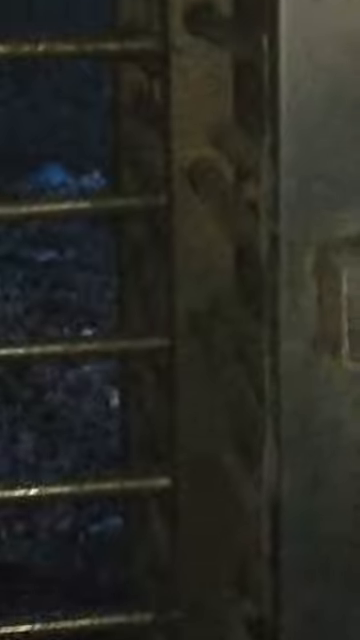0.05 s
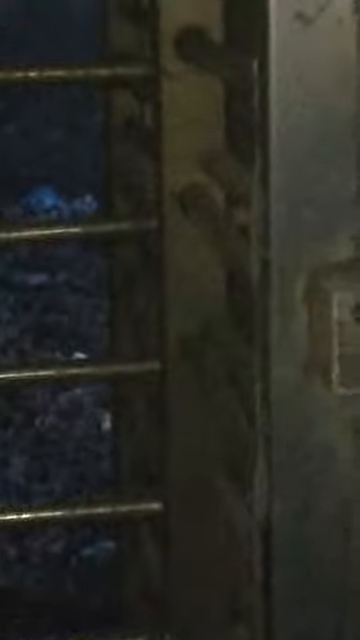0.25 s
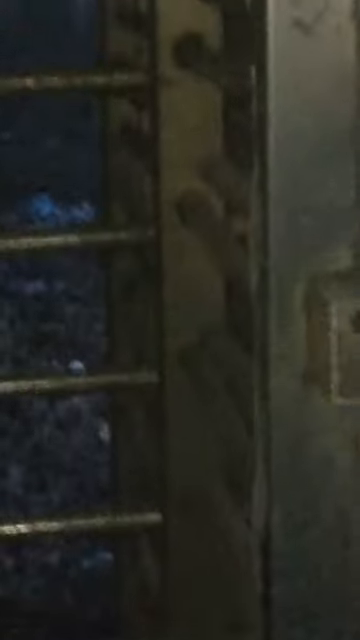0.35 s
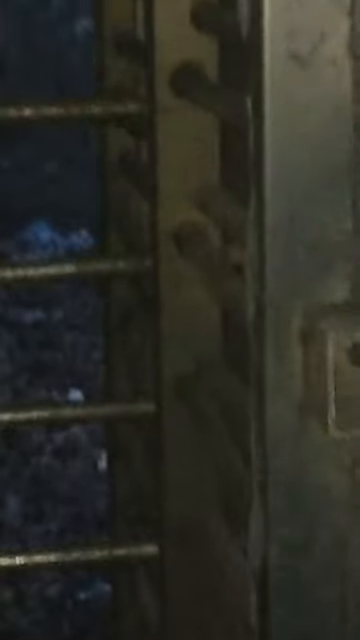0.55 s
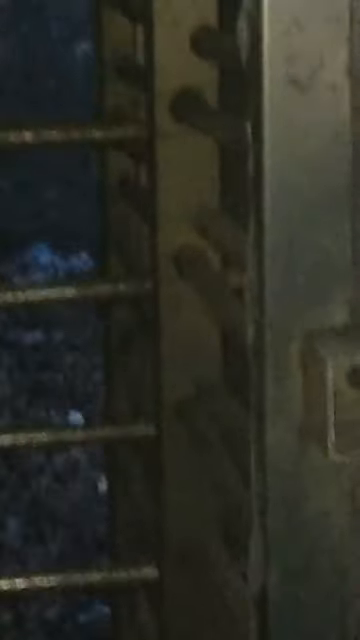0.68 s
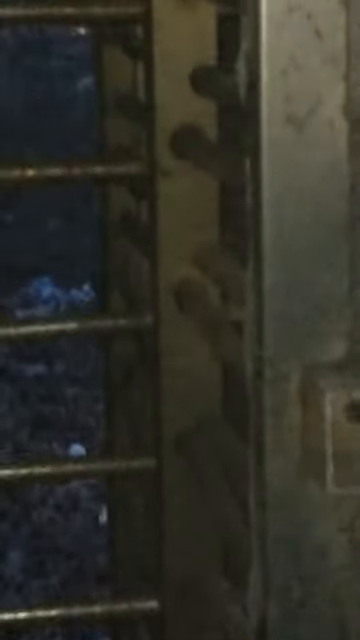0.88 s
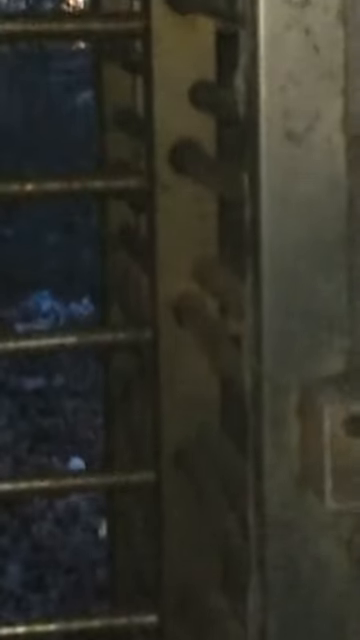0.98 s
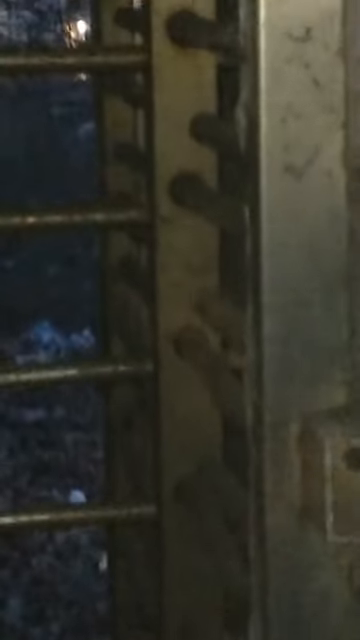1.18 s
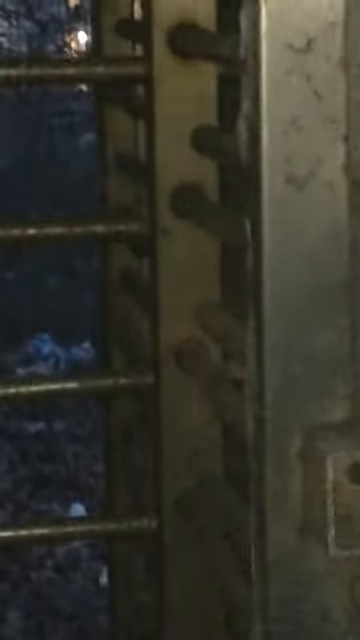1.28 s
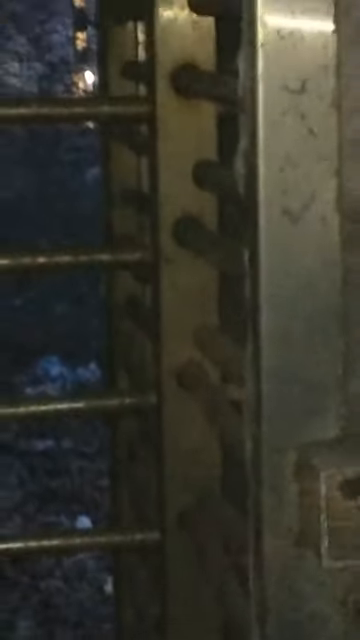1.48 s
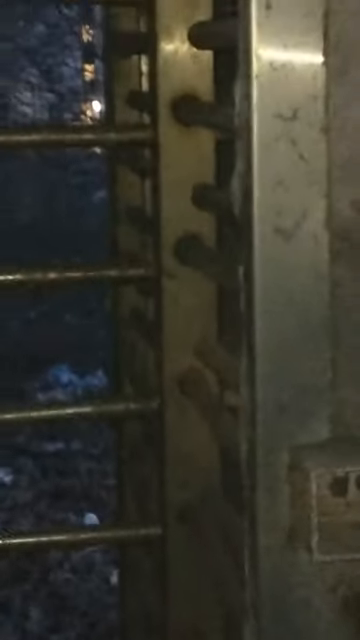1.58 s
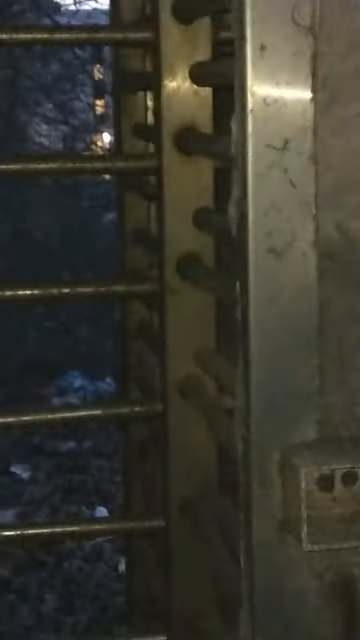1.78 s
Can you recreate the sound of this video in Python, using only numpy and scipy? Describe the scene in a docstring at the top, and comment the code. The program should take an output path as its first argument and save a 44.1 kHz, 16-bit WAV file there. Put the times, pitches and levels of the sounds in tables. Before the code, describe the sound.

A steel turnstile latch slams with one sharp, briefly ringing clunk after a soft scuff; loose parts rattle, a pawl clicks, and light ticks follow. Close handheld microphone with low bumps, quiet outdoor rumble behind.

```python
"""A distant outdoor rumble (coloured noise) runs throughout, under a far hiss that fades.
A soft scuff comes first; then low bumps on the hand-held microphone (short sine swells) and the first rattles.
A steel turnstile clunks once: the latch slams home in a quick run of noise bursts, and decaying sines ring.
Loose parts rattle on as bursts of noise; later the pawl drops into its notch, followed by two faint rattles.
Last come a few light ticks of a small part, each a click with a short ping, and a few more bumps."""
import sys
import numpy as np
from scipy import signal
from scipy.fft import rfft, irfft
from scipy.io import wavfile

SR = 44100
rng = np.random.default_rng(int(sys.argv[2]) if len(sys.argv) > 2 else 0)


def wav_out(sig):
    """Save sig, one row per channel (or a flat mono array), as 16-bit PCM at SR to the path in sys.argv[1]."""
    wavfile.write(sys.argv[1], SR, np.round(np.clip(np.atleast_2d(sig).T, -1, 1) * 32767).astype(np.int16))


N = 81585
TIME = np.arange(N) / SR  # seconds
CUTOFF_HZ = 7900  # top of the sound
CONTACT_RISE_S = 0.00089  # rise of every small contact


def from_db(db):
    """Turn decibels into a plain gain."""
    return 10 ** (np.asarray(db) / 20)


def noise(spectrum):
    """Noise whose strength at each pitch follows a table, scaled to an rms of 1."""
    hz, db = np.transpose(spectrum)
    freqs = np.maximum(np.arange(N // 2 + 1) * SR / N, 1)
    gain = from_db(np.interp(np.log(freqs), np.log(hz), db))
    gain = gain * (freqs < CUTOFF_HZ + 1000)
    coloured = irfft(rfft(rng.standard_normal(N)) * gain, N)
    return coloured / coloured.std()


def lowpass(sound, hz, order=1):
    """Soften a sound by weakening what lies above hz (Butterworth filter)."""
    safe_hz = np.clip(hz, 10, SR / 2 - 1000)
    sos = signal.butter(order, safe_hz, fs=SR, output="sos")
    return signal.sosfilt(sos, sound + 1e-18)  # the tiny offset is inaudible


def burst(start_s, t60_s, rise_s):
    """Loudness of a blow: a quick rise times a decay that falls 60 dB in t60_s."""
    age = np.maximum(TIME - start_s, 0)
    decay = np.exp(-np.minimum(np.log(1000) * age / t60_s, 20))
    return (1 - np.exp(-age / rise_s)) * decay


def ring(start_s, hz, t60_s, rise_s):
    """One way a struck part vibrates: a sine that dies away."""
    return np.sin(2 * np.pi * hz * (TIME - start_s)) * burst(start_s, t60_s, rise_s)


def contact(start_s, t60_s):
    """Loudness of a small contact, with a faint, longer answer from the surroundings."""
    direct = burst(start_s, t60_s, CONTACT_RISE_S)
    echo = from_db(-30) * burst(start_s, 0.21, .004)
    return np.hypot(direct, echo)


def clicks(touches, spectrum, t60_s):
    """Short, heavily damped touches that share one colour of noise."""
    loudness = sum(from_db(db) * contact(s, t60_s) for s, db in touches)
    return noise(spectrum) * loudness


def outdoors():
    """Far sounds blur into noise: a steady rumble and a hiss that fades."""
    # colour of the rumble: (frequency [Hz], relative level per Hz [dB])
    rumble_colour = [(25, -23.5), (45, -8), (65, 3), (100, -0.5), (160, -7.5), (210, -12), (320, -10),
                     (500, -13), (800, -15.5), (950, -6), (1140, -5.5), (1300, -16.5), (1520, -11),
                     (1800, -23.5), (2300, -25), (2900, -30.5), (4000, -36.5), (7200, -39.5), (7900, -48)]
    # colour of the hiss: (frequency [Hz], relative level per Hz [dB])
    hiss_colour = [(200, 1.5), (700, -3), (1150, 3), (1950, -1), (2600, -16.5), (4600, -16.5), (5200, -30),
                   (7500, -33)]
    # fading of the hiss: (time [s], level [dB])
    hiss_level = [(0, -58), (.13, -57), (.35, -60), (.85, -63.5), (1.1, -70.5), (1.85, -75)]
    rumble = from_db(-59) * noise(rumble_colour)
    hiss_gain = from_db(np.interp(TIME, *np.transpose(hiss_level)))
    return rumble + hiss_gain * noise(hiss_colour)


def scuffs():
    """A soft scuff: two overlapping, quickly damped touches of dull noise."""
    # touches of the scuff: (time [s], level [dB])
    scuff_touches = [(0.0790, -41), (0.0870, -48)]
    # colour of the scuff: (frequency [Hz], relative level per Hz [dB])
    scuff_colour = [(150, -12.5), (320, 0), (450, 1.5), (650, -12.5), (1200, -9.5), (2000, -16),
                    (3500, -40), (7500, -45)]
    return clicks(scuff_touches, scuff_colour, t60_s=0.032)


def bumps():
    """Each microphone bump swells and dies within a few cycles, with a little rubbing noise."""
    # soft bumps: (time [s], level at the height of the swell [dB], pitch [Hz], swell time [s])
    bump_list = [(0.109, -36, 104, 0.0032), (0.222, -40.5, 91, 0.0042), (0.238, -36, 120, 0.0055),
                 (0.243, -41, 200, 0.0037), (0.299, -41.5, 85, 0.0053), (0.337, -45, 91, 0.0051),
                 (0.418, -41, 95, 0.0046), (0.527, -38.5, 95, 0.0045), (0.545, -51, 371, .004),
                 (0.565, -48, 100, .004), (0.598, -49, 75, 0.0069), (0.666, -46, 98, 0.003),
                 (0.682, -39, 86, 0.0062), (0.804, -46, 73.6, 0.0047), (0.907, -38.5, 79.5, 0.004),
                 (0.924, -37, 98, 0.0052), (1.102, -45.5, 83.5, 0.0051), (1.250, -47.5, 86, 0.0041),
                 (1.584, -46.5, 105, 0.0035), (1.656, -50.5, 118, 0.0069), (1.684, -40.5, 102, 0.0039),
                 (1.838, -42.5, 90, 0.0033)]
    grit = lowpass(noise([(40, -7.5), (100, -0.5), (8000, 2)]), 178, order=3)
    grit = from_db(-14.5) * grit / grit.std()
    total = 0
    for s, db, hz, swell_s in bump_list:
        age = np.maximum(TIME - s, 0)
        # the swell is highest, at 1, after two swell times
        swell = (age / swell_s / 2) ** 2 * np.exp(2 - np.minimum(age / swell_s, 40))
        tone = np.sin(2 * np.pi * hz * age)
        total = total + from_db(db) * swell * (tone + grit)
    return total


def rattles():
    """Loose steel parts chatter: short bursts of one noise, each touch with its own brightness."""
    # touches of the loose parts: (time [s], relative level [dB], treble gain [dB])
    rattle_touches = [(0.1657, -13, -6), (0.2485, -8.5, 3.5), (0.367, -15.5, 8.5), (0.4980, -3.5, 0),
                      (0.523, -9.5, 4), (0.5661, -7.5, 1), (0.5958, -3.5, 4), (0.603, 2, -3.5),
                      (0.6146, -15, -8), (0.6211, -1, 3.5), (0.634, -1.5, -16), (0.6686, -2.5, -7),
                      (0.6843, -15, 1), (0.6909, -7, 5), (0.7497, -13.5, 3), (0.775, -17.5, 2),
                      (1.3655, -15.5, 6), (1.3854, -15, 1)]
    # colour of the steel before the treble gain: (frequency [Hz], relative level per Hz [dB])
    steel_colour = [(300, -7), (1150, 2), (1600, -5), (2020, 4), (2500, -5), (3500, -8), (3950, -2.5),
                    (4500, -3), (5100, -13.5), (7400, -15.5), (7950, -28)]
    steel = noise(steel_colour)
    treble_split = signal.butter(4, 5000, fs=SR, output="sos")  # Hz
    body = signal.sosfiltfilt(treble_split, steel)
    treble = steel - body
    total = 0
    for s, db, treble_db in rattle_touches:
        touch = body + from_db(treble_db) * treble
        total = total + from_db(db) * contact(s, t60_s=0.017) * touch
    return from_db(-39.5) * total


def clunk():
    """Latch contacts crack, the frame rings, the housing booms and a wash of noise dies away."""
    # contacts of the latch: (time [s], relative level [dB], low-pass [Hz])
    latch_contacts = [(0.439, -17, 6030), (0.4417, -5, 9740), (0.4442, -1.5, 9000), (0.4472, 0.5, 8000),
                      (0.4502, 0.5, 3960), (0.4520, -1.5, 2980), (0.457, -11, 2490)]
    # dense upper vibrations of the steel: (frequency [Hz], relative level per Hz [dB])
    crack_colour = [(100, -11), (200, -8), (320, 4.5), (550, -5.5), (850, 0), (1050, 1), (1350, 3.5),
                    (1650, -2.5), (2200, -0.5), (3400, -1.5), (4600, -3), (5800, -9.5), (7000, -1.5),
                    (7900, -20.5)]
    # separate vibrations of the frame: (pitch [Hz], relative level [dB], time to fall 60 dB [s])
    frame_modes = [(294, -41, 0.11), (333.3, -40.5, .19), (443.6, -39.5, 0.098), (789, -30.5, 0.075),
                   (909, -33, 0.045), (1186, -28, 0.055), (1409, -23.5, 0.046), (1773, -32, 0.078),
                   (2205, -33.5, .05), (2250, -32, .05), (2750, -39, 0.047), (3080, -34, 0.048),
                   (3301, -32.5, 0.055), (4187, -35, 0.056), (4780, -39, 0.06), (6850, -36, .042),
                   (7004, -40, .04)]
    # boom of the housing: (pitch [Hz], level [dB], time to fall 60 dB [s])
    housing_modes = [(103.5, -25, .11), (147, -28.5, 0.13)]
    # colour of the fading wash: (frequency [Hz], relative level per Hz [dB])
    wash_colour = [(80, -2), (210, -2), (330, 8), (600, -5), (1200, -2), (2000, -10.5), (3200, -16),
                   (5000, -28), (7500, -32)]
    frame_s, boom_s = .4455, .4525  # start times

    crack = 0
    for s, db, soft_hz in latch_contacts:
        hit = noise(crack_colour) * burst(s, t60_s=0.034, rise_s=0.00012)
        crack = crack + from_db(db) * lowpass(hit, soft_hz)
    frame = 0
    for hz, db, t60_s in frame_modes:
        start_s = frame_s + rng.random() / hz  # chance delay of up to one cycle
        frame = frame + from_db(db) * ring(start_s, hz, t60_s, rise_s=0.0021)
    boom = sum(from_db(db) * ring(boom_s, hz, t60_s, rise_s=0.0011) for hz, db, t60_s in housing_modes)
    wash = noise(wash_colour) * burst(boom_s, t60_s=0.65, rise_s=0.0042)
    return from_db(-25) * crack + from_db(1) * frame + boom + from_db(-43) * wash


def pawl_drops():
    """The pawl drops into its notch: two damped touches of noise in quick succession."""
    # touches of the pawl: (time [s], level [dB])
    pawl_touches = [(1.3386, -41), (1.3412, -45)]
    # colour of the pawl: (frequency [Hz], relative level per Hz [dB])
    pawl_colour = [(300, -18), (800, -4), (1050, -6), (1270, 10.5), (1550, -13), (2000, 2), (2800, -8.5),
                   (4000, -5), (4600, -9), (5300, -27), (7200, -23.5), (7950, -32)]
    return clicks(pawl_touches, pawl_colour, t60_s=0.016)


def ticks():
    """A small part clicks at each touch and pings briefly at one pitch."""
    # light ticks: (time [s], relative level [dB])
    tick_touches = [(1.5172, -52), (1.5340, -57), (1.6068, -53), (1.6282, -66), (1.7028, -55),
                    (1.7307, -61), (1.8215, -69.5)]
    # colour of the click: (frequency [Hz], relative level per Hz [dB])
    tick_colour = [(1500, -10), (3100, -6), (3500, 0.5), (3950, -8.5), (5200, -20), (7100, -15),
                   (7900, -31)]
    ping_hz, t60_s = 3490, .019
    ping = sum(from_db(db) * ring(s, ping_hz, t60_s, CONTACT_RISE_S) for s, db in tick_touches)
    click = clicks(tick_touches, tick_colour, t60_s)
    return from_db(-1) * ping + from_db(-3.5) * click


def scene():
    """The turnstile close by, touches and bumps, and the outdoors behind it."""
    turnstile = rattles() + clunk() + pawl_drops() + ticks()
    return (outdoors() + scuffs() + bumps() + turnstile)[None]  # one channel


def record(dry):
    """The microphone thins the deep bass; the top is cut steeply."""
    bass_cut = signal.butter(3, 50, "high", fs=SR, output="sos")
    thin = signal.sosfilt(bass_cut, dry)
    top_cut = signal.ellip(10, .3, 80, CUTOFF_HZ, fs=SR, output="sos")
    return signal.sosfilt(top_cut, thin)


dry = scene()
out = record(dry)
wav_out(out)
```